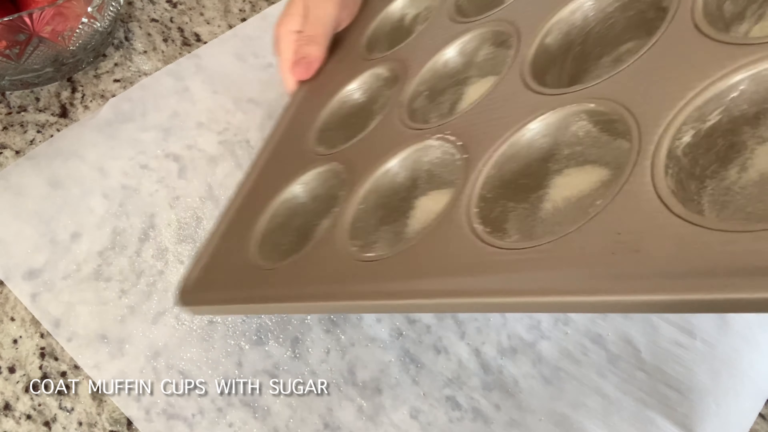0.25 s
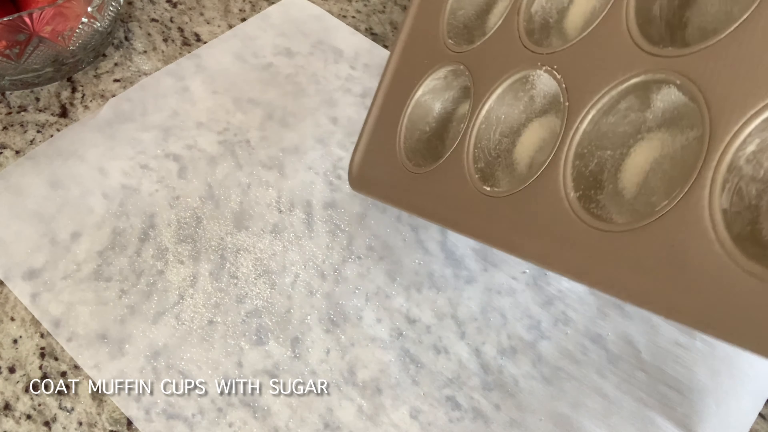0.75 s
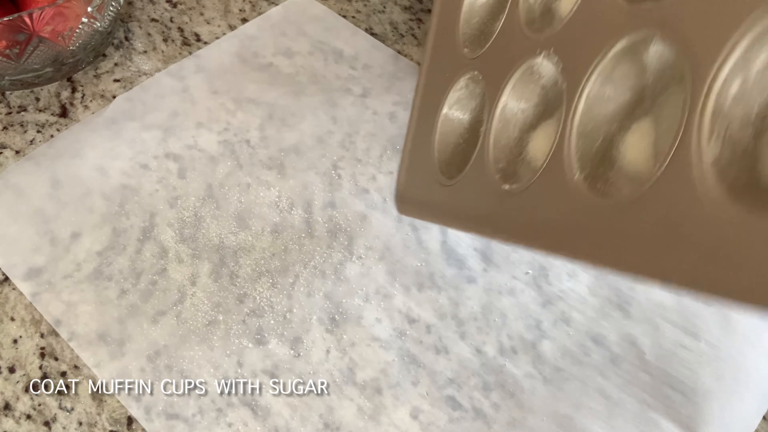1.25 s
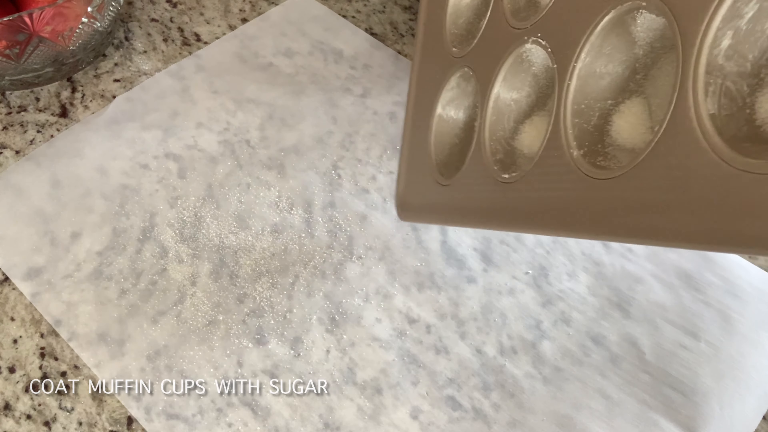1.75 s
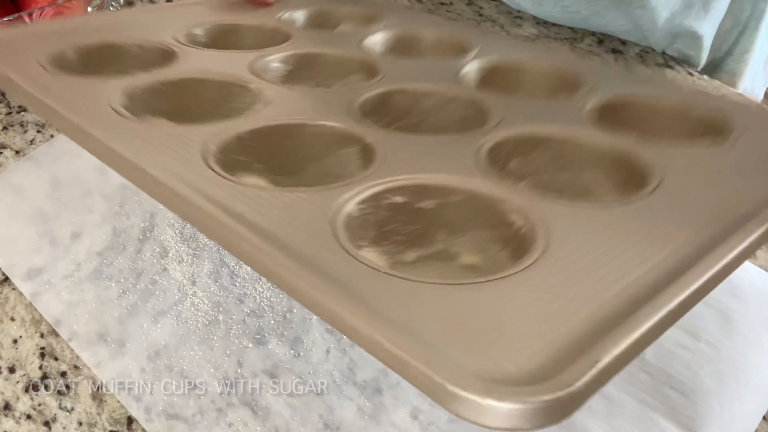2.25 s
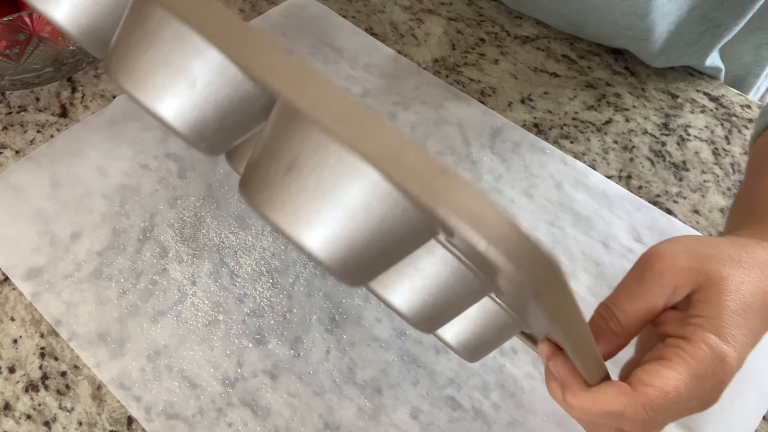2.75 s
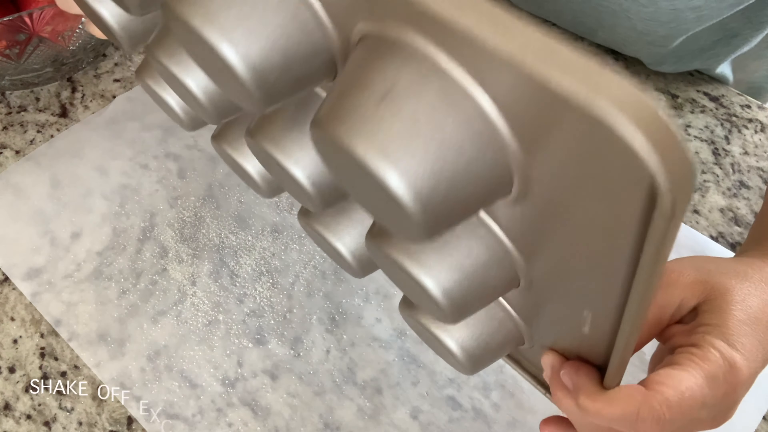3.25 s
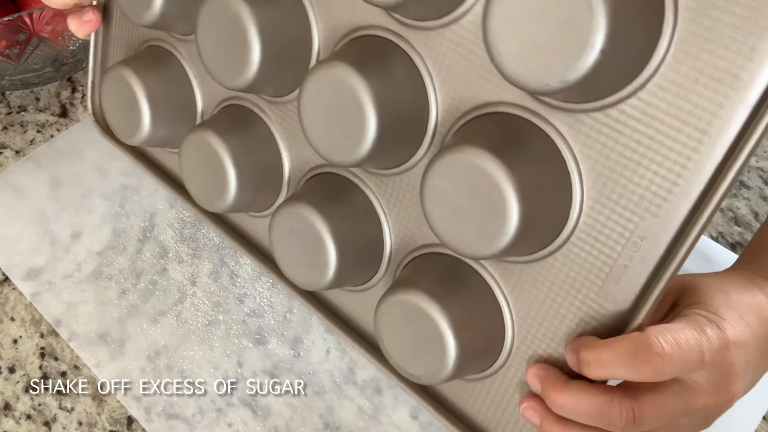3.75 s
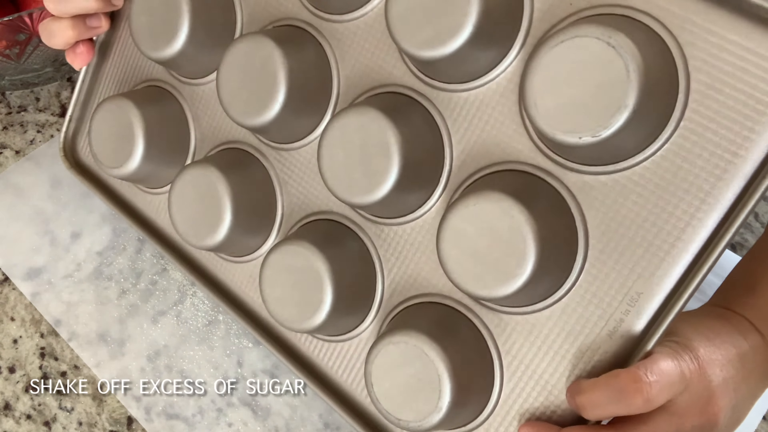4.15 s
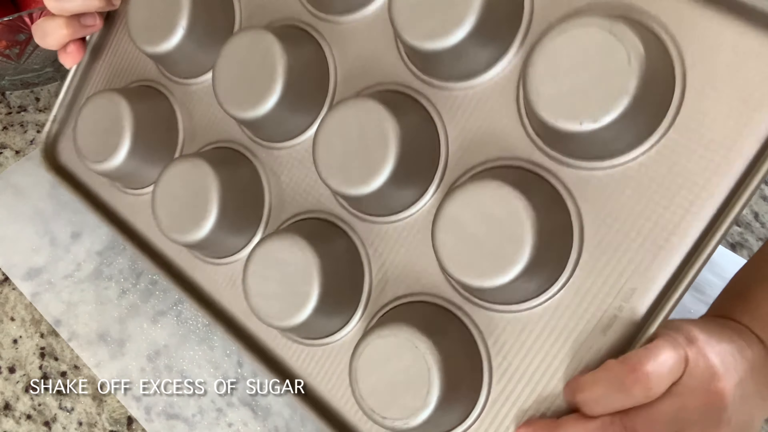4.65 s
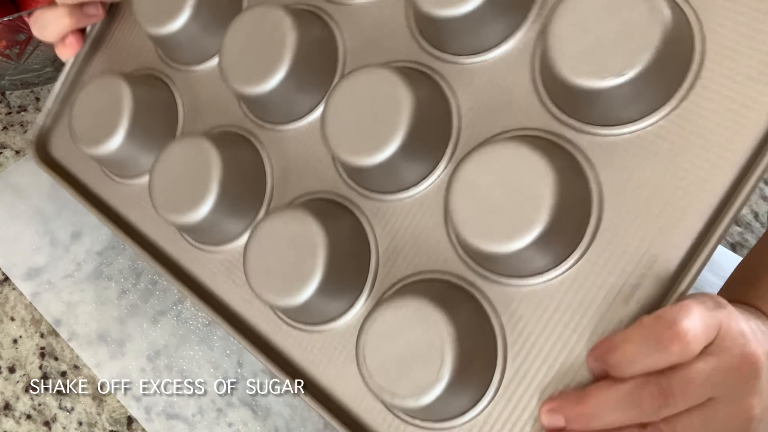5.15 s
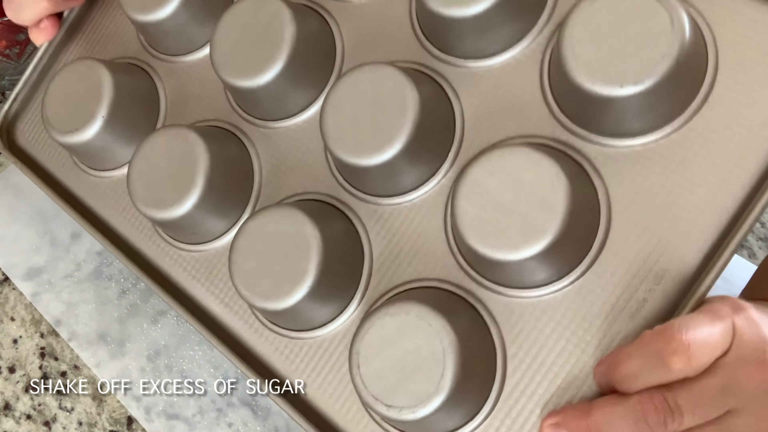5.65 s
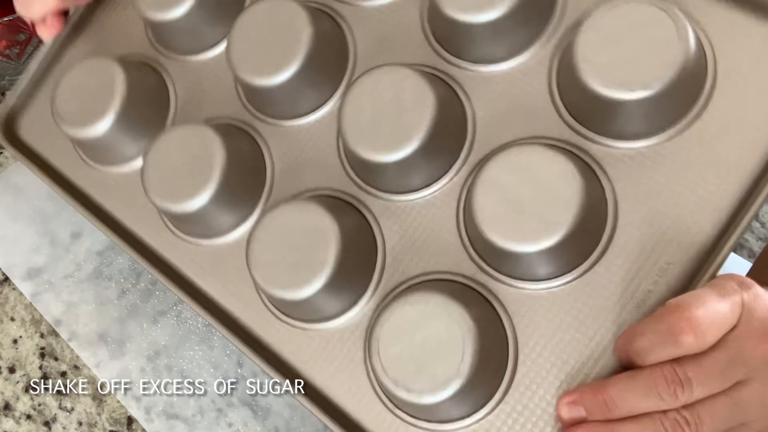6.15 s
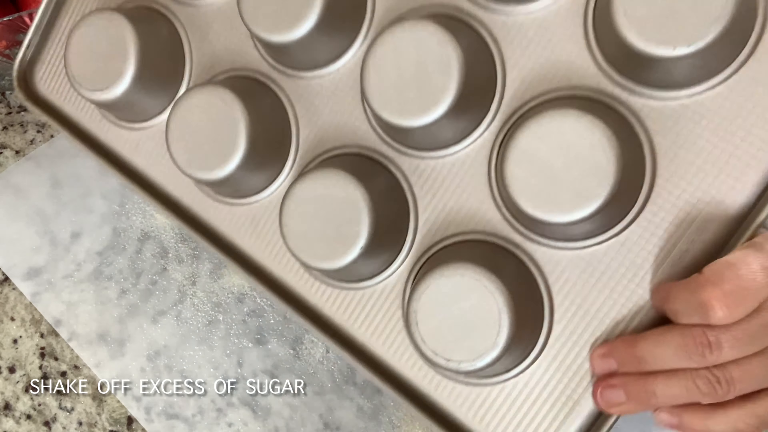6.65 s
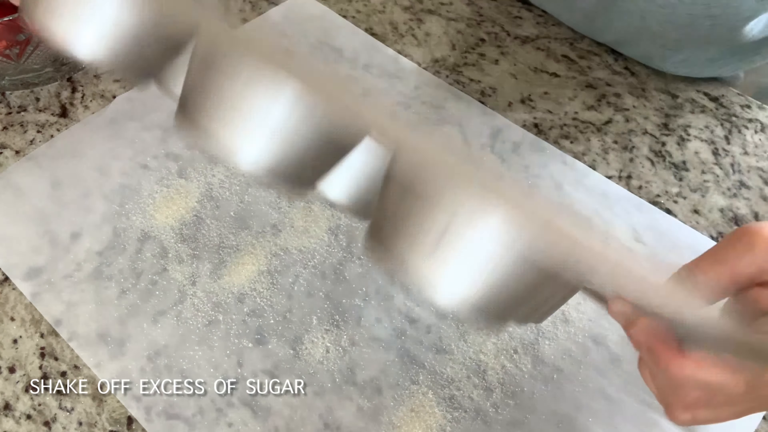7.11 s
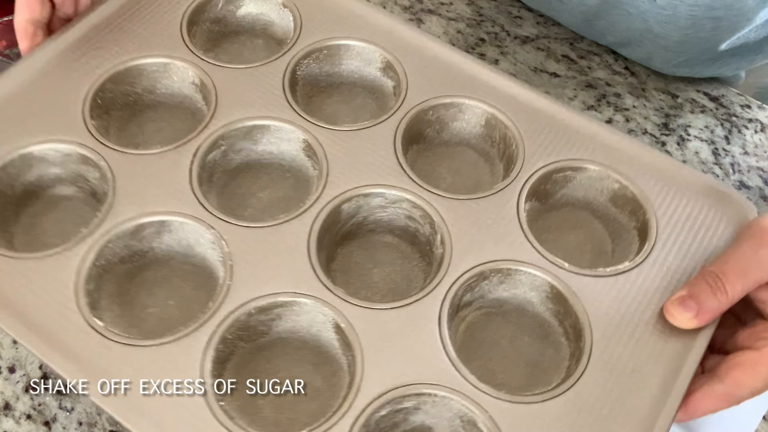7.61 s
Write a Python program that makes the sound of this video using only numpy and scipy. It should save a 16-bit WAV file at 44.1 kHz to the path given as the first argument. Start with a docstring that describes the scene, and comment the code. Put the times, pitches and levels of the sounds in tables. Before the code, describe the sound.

Fine sugar whispers across a steel muffin pan, one sharp clank, then a bright grainy rush onto paper thinning into shaken patter and rustling.

```python
"""Sugar poured from a muffin pan

A steel muffin pan dusted with sugar is tilted over a paper sheet on a kitchen counter. Showers of tiny
random impacts make the sugar hiss over steel and ring the cups. One hard knock rings the pan's modes and
makes the grains jump. Then the pan is turned over: sugar pours and patters onto the paper, with short noise
ticks of crumbs and of the rim, while the rim rubs on it. Echo fills the kitchen; an appliance hums in tones
and narrow resonances, and a soft rush of filtered noise lies behind."""
import sys
import numpy as np
from scipy import signal
from scipy.fft import rfft, irfft, next_fast_len
from scipy.io import wavfile
from scipy.ndimage import uniform_filter1d

SR = 44100
rng = np.random.default_rng(int(sys.argv[2]) if len(sys.argv) > 2 else 0)


def master_out(mix):
    """Clip the mix to full scale and print it as 16-bit PCM to the path in sys.argv[1]."""
    frames = np.transpose(np.atleast_2d(mix))
    ceiling = np.clip(frames, -1, 1)
    pcm = np.round(ceiling * 32767).astype(np.int16)
    wavfile.write(sys.argv[1], SR, pcm)


N = 347448
TIME = np.arange(N) / SR
SIZE = next_fast_len(N, real=True)
FREQ = np.fft.rfftfreq(SIZE, 1 / SR)

# All dB columns are relative levels; the functions that use them set the final balance.
# Heaps of sugar slip as the pan tilts.
# Each row: time of fastest flow in seconds, rise in seconds, fall in seconds, hiss in dB, cup ring in dB.
SLIDES = [(0.166, 0.089, 0.1, -66.5, -59), (.4, 0.078, 0.19, -74.5, -69.5), (.76, 0.1, 0.046, -70, -71),
          (0.898, 0.063, 0.11, -72, -62.5), (1.4, 0.071, 0.16, -83, -76), (1.56, 0.071, 0.1, -79, -76),
          (2.01, 0.045, .1, -71, -70.5), (2.12, 0.088, 0.09, -69, -67.5), (2.36, 0.21, 0.23, -75, -72),
          (2.54, 0.045, 0.082, -73, -69), (3.005, 0.022, 0.043, -75.5, -68.5),
          (3.174, 0.0094, 0.068, -74, -74), (3.275, 0.0775, 0.15, -70.5, -64.5),
          (3.72, 0.25, 0.13, -81.5, -76.5), (4.1, 0.31, .18, -68.5, -65.5), (6.95, 0.22, 0.17, -78.5, -72),
          (7.22, 0.066, 0.13, -76.5, -75), (7.48, 0.073, 0.1, -74.5, -72),
          (7.578, 0.056, 0.072, -79.5, -70.5)]
# Fingers shift their grip and scuff the steel.
# Each row: time of the peak in seconds, rise and fall length in seconds, ring in dB.
SCUFFS = [(0.82, 0.019, -64.5), (0.88, 0.022, -59.5), (1.014, .022, -70), (1.729, 0.03, -72),
          (1.952, 0.038, -75), (3.013, 0.027, -71), (3.22, 0.047, -67), (7.299, .07, -76),
          (7.43, .035, -72), (7.766, 0.076, -79)]
# Hiss of sliding grains on steel. Each row: frequency in Hz, level in dB per Hz.
STEEL_HISS = [(900, -11.5), (2000, -11), (3100, 3), (4800, -0.5), (6500, -0.5), (7300, -15.5), (8100, -1),
              (9500, 1.5), (12000, 0), (14500, -5.5)]
# Resonances that the grains wake in the cups. Each row: frequency in Hz, width in Hz, level in dB.
CUPS = [(1500, 210, -3), (1706, 71, -2), (1838, 100, 1.5), (1952, 27, -7), (2580, 51, -4), (3790, 95.5, -6),
        (4485, 140, -11.5), (4800, 90, -10.5), (5640, 400, -13.5), (6200, 150, -16.5)]
# Thin whistly resonances of the cup walls under a slow trickle.
# Each row: frequency in Hz, width in Hz, level in dB.
WALLS = [(1865, 50, -5), (2635, 37, -6.5), (3796, 77, 5), (6270, 120, 0)]
# The first rush of sugar onto the paper. Each row: time in seconds, hiss in dB.
POUR = [(3.75, -85), (3.79, -58.5), (3.98, -48), (4.12, -45.5), (4.24, -47), (4.38, -54), (4.52, -60.5),
        (4.7, -72)]
# The thin fall that the shaking keeps up. Each row: time in seconds, hiss in dB.
PATTER = [(4.3, -60), (4.52, -62), (4.585, -55), (4.63, -60), (4.665, -48.5), (4.69, -54.5), (4.82, -56),
          (4.92, -60.5), (5.0, -61.5), (5.06, -69), (5.16, -68.5), (5.28, -67.5), (5.37, -71.5),
          (5.43, -60.5), (5.52, -68.5), (5.58, -63.5), (5.64, -70.5), (5.78, -68.5), (5.85, -77),
          (5.94, -73.5), (6.1, -68.5), (6.15, -65), (6.25, -66), (6.32, -67), (6.41, -68), (6.49, -70.5),
          (6.62, -71.5), (6.9, -94)]
# Hiss of grains on paper. Each row: frequency in Hz, level in dB per Hz.
PAPER_HISS = [(500, -53), (1000, -18), (1600, -10), (2300, -11), (3200, -11), (4000, -5.5), (5200, -3.5),
              (7000, -1), (8400, 1), (12000, 0.5), (14000, 1.5), (15500, -11)]
# Ticks of crumbs on the paper, and duller ticks of the rim near 4 kHz.
# Each row: time in seconds, peak in dB, centre frequency in Hz, width in octaves.
TICKS = [(2.9244, -51.5, 11900, 0.37), (3.7863, -58, 11000, 1), (4.5877, -43, 11000, 1.3),
         (4.6617, -43, 10000, 1.1), (5.0007, -41, 8200, 0.69), (5.0714, -55, 10000, 1.1),
         (5.1786, -45, 12500, 0.97), (5.2289, -55, 11600, 1), (5.2594, -59, 10200, 1),
         (5.4292, -34.5, 7900, 1.6), (5.467, -46, 12400, 1.4), (5.6616, -37.5, 10000, 1.2),
         (5.7, -39, 11000, 1.7), (5.7473, -55, 9100, 1.1), (5.8106, -67, 3750, 1.5),
         (5.9533, -64, 3840, 1.8), (6.0227, -45, 12500, 1.1), (6.1339, -53, 10100, 1),
         (6.3579, -55, 12500, 0.87), (6.6164, -55, 11600, 1), (6.6772, -61, 12400, .8),
         (6.931, -47, 12500, 0.9), (7.073, -64, 4400, 1.3)]
# One hard knock, then light taps.
# Each row: start in seconds, force in dB, time from first touch to strongest push in milliseconds.
KNOCKS = [(1.0761, -16, 0.081), (1.521, -65, 0.033), (1.689, -72, 0.016), (2.456, -61.5, 0.074),
          (3.166, -61, 0.042), (5.658, -62.5, 0.096)]
# Modes of the pan, damped by the hands.
# Each row: frequency in Hz, level in dB, time to fall 60 dB in seconds, left minus right in dB.
PAN_MODES = [(137, -15, 0.14, -3), (224.1, -22.5, 0.12, -0.5), (334.5, -10.5, 0.068, -8),
             (386, -17.5, 0.13, -1), (675, -15.5, 0.078, -5), (784, -15.5, 0.12, 3),
             (1134, -19.5, 0.063, -6), (1331, -13.5, 0.069, -0.5), (1476, 2, 0.072, 3.5),
             (1634, -8.5, 0.08, 3), (1740, -8.5, 0.056, 8), (1836, 0, 0.06, 3.5), (1938, -1.5, 0.098, 9.5),
             (2004, -11, 0.086, 14.5), (1950, -15.5, 0.1, 5.5), (2460, -28.5, .08, 13),
             (2474, -8, 0.095, 5), (2622, -6, 0.062, 4.5), (2790, -8, 0.035, -3),
             (3180, -10.5, 0.038, 11.5), (3570, -22, 0.083, 6), (3876, -4, 0.027, 0),
             (4490, 0.5, 0.03, 5.5), (4960, -5.5, .028, 3.5)]
# Crack of a knock, strongest where the modes crowd. Each row: frequency in Hz, level in dB per Hz.
CRACK = [(100, -5.5), (240, -7.5), (340, 0), (550, -7), (790, -5), (880, -15), (1150, -12), (1380, -7),
         (1490, 0.5), (1750, 1), (2050, 2.5), (2250, -4.5), (2500, 1.5), (2830, -3), (3150, 1.5),
         (4450, 3.5), (6000, -6.5), (9000, -11), (15000, -11.5)]
# The rim rubs on the paper at each push and pull of the shaking.
# Each row: time of the peak in seconds, level in dB.
SHAKES = [(4.585, -67), (4.64, -69), (4.755, -72), (4.86, -68.5), (4.985, -70), (5.085, -68), (5.16, -71),
          (5.23, -69), (5.31, -70.5), (5.375, -68), (5.45, -75), (5.525, -73.5), (5.59, -73),
          (5.662, -69.5), (5.74, -78), (5.815, -69), (5.895, -70.5), (5.985, -66.5), (6.055, -66.5),
          (6.152, -67.5), (6.22, -68.5), (6.315, -66), (6.375, -68), (6.445, -69), (6.52, -72), (6.59, -76),
          (6.645, -76)]
# Resonances of the rubbing rim. Each row: frequency in Hz, width in Hz, level in dB.
RIM = [(1358, 53, 6.5), (1700, 430, -4), (2023, 300, -4), (2540, 260, -5.5), (3390, 720, -5.5),
       (4000, 110, -6.5), (4850, 500, -8), (5800, 690, -9)]
# Steady tones of the appliance. Each row: frequency in Hz, level in dB.
HUM = [(108.6, -84), (120, -58), (144.6, -84.5)]
# Resonances that the appliance shakes. Each row: frequency in Hz, width in Hz, level in dB.
DRONES = [(115, 51, -72), (138.2, 23, -69), (174.8, 18, -76), (295.2, 6.9, -80), (382, 12, -85.5),
          (809, 9.8, -76.5), (1011, 15, -79.5), (2590, 137, -88.5)]
# Colour of the soft rush in the room. Each row: frequency in Hz, level in dB per Hz.
ROOM_AIR = [(20, -24), (36, 7.5), (50, 6.5), (90, 3), (150, 5.5), (220, 2.5), (400, 2), (560, 0.5),
            (760, 3.5), (880, -5), (1100, -4), (1600, -15), (2600, -13.5), (4500, -25.5), (8000, -46),
            (15000, -50)]
# Brief dips in level. Each row: centre in seconds, half width in seconds, depth from 0 to 1.
DIPS = [(2.686, 0.022, 0.93), (5.17, 0.034, 0.34)]

SLIDE_EDGE_DB = 10  # how far a swell has dropped after its rise or fall time
# sugar thrown up by the hard knock lands again after a short flight
JUMP_DB, JUMP_FALL_S, FLIGHT_S = -51.5, 0.046, 0.079
LANDING_DB, LANDING_RISE_S, LANDING_FALL_S = -63.5, 0.012, 0.022
# once the pan is turned, the cup walls face away
FACE_UP_UNTIL_S, FACE_DOWN_DB = 2.72, -7
FLICKER_DB = 2.6  # spread of the changes in hiss colour
# the faint ring that outlasts the clang: level against each mode, 60 dB decay up to 1 kHz (then shorter)
LINGER_DB, LINGER_T60_S = -29, 0.8
STROKE_RISE_S, STROKE_FALL_S = 0.044, 0.033
BUMP_S = 0.435  # time of the hand's bump
SUGAR_ECHO_DB, ROOM_BALANCE_DB = -14, -1.8
TOP_HZ = 15150  # the treble is cut above this


def undb(db):
    """Turn decibels into a gain."""
    return np.exp(np.asarray(db) * np.log(10) / 20)


def unit(x):
    """Scale to an rms of 1."""
    return x / np.sqrt(np.mean(x ** 2))


def sides(db):
    """Left and right gains for a level difference, left minus right."""
    return undb(np.array([[db], [-db]]) / 2)


def gain_curve(rows):
    """Gain that follows (seconds, dB) rows, practically silent outside them."""
    rows = np.array(rows)
    return undb(np.interp(TIME, rows[:, 0], rows[:, 1], left=-140, right=-140))


def swell(s, rise_s, fall_s, db):
    """Gain that peaks at s and is SLIDE_EDGE_DB lower rise_s before and fall_s after."""
    away = np.maximum((s - TIME) / rise_s, (TIME - s) / fall_s)
    return undb(db - SLIDE_EDGE_DB * np.minimum(away, 10))


def walk(rate):
    """Smoothly joined random values with an rms of 1; a higher rate changes faster."""
    return unit(np.interp(2 * rate * TIME, np.arange(N // 20), rng.standard_normal(N // 20)))


def filtered(x, gain):
    """Filter by a gain for every frequency."""
    return irfft(rfft(x, SIZE) * gain, SIZE)[..., :N]


def at_pitch(points, hz):
    """Read between (Hz, value) points on a log frequency axis."""
    point_hz, value = np.transpose(points)
    return np.interp(np.log(np.maximum(hz, 1)), np.log(point_hz), value)


def colour(x, points):
    """Filter by a short spectrum of (Hz, dB) points."""
    return filtered(x, undb(at_pitch(points, FREQ)))


def ring(x, response):
    """Pass a sound through a stereo impulse response."""
    return signal.fftconvolve(np.atleast_2d(x), response, axes=1)[:, :N]


def ports(x, lag_ms):
    """A sound from the right reaches the left microphone later."""
    late = filtered(x, np.exp(-2j * np.pi * FREQ * lag_ms / 1000))
    return np.array([late, x])


def resonate(x, modes, wander_db):
    """Ring resonances; neighbours wax and wane apart as the point of contact moves."""
    spectrum = rfft(x, SIZE)
    out = 0
    for group in (modes[::2], modes[1::2]):
        response = 0
        for hz, width, db in group:
            damping = 1j * FREQ * width
            response = response + undb(db) * damping / (hz ** 2 - FREQ ** 2 + damping)
        out = out + undb(wander_db * walk(7)) * irfft(spectrum * response, SIZE)[:, :N]
    return out


def grains(per_s, spread_db):
    """Tiny impacts of uneven size; a thin stream leaves them apart."""
    chance = np.clip(per_s / SR, 1e-4, 1) * np.ones(N)  # of an impact at each sample
    size = undb(spread_db * np.minimum(rng.exponential(size=N), 5))
    hits = rng.random(N) < chance
    return unit(hits * size * rng.choice([-1, 1], N) / np.sqrt(chance))


def shower(per_s, spread_db, lag_ms, apart):
    """Grains heard by both microphones, plus scattered ones that reach only one."""
    shared = ports(grains(per_s, spread_db), lag_ms)
    scattered = np.array([grains(per_s, spread_db) for _ in range(2)])
    return shared + apart * scattered


def heaps():
    """How much sugar slides and how hard it stirs the steel; overlapping heaps add in power."""
    flow_power, stir_power = 0, 0
    for s, rise_s, fall_s, hiss_db, ring_db in SLIDES:
        shape = swell(s, rise_s, fall_s, 0)
        flow_power = flow_power + (shape * undb(hiss_db)) ** 2
        stir_power = stir_power + (shape * undb(ring_db)) ** 2
    return np.sqrt(flow_power), np.sqrt(stir_power)


def scuffing():
    """How hard the shifting fingers stir the steel."""
    return np.sqrt(sum(swell(s, length_s, length_s, db) ** 2 for s, length_s, db in SCUFFS))


def sliding(flow, stir, hiss_db=3, ring_db=2, flutter_db=0.36):
    """Grains skitter over the steel: a bright hiss, and the cups ring faintly under them."""
    rate = 9000 * np.sqrt(flow / undb(-73.0))  # more flow, more impacts per second
    hiss = unit(colour(shower(rate, 1.2, 0.018, 1.0), STEEL_HISS)) * flow * sides(-1.176)
    metal = unit(resonate(shower(5000, 3.3, 0.092, 0.95), CUPS, wander_db=4.5)) * stir
    return (undb(hiss_db) * hiss + undb(ring_db) * metal) * undb(flutter_db * walk(25))


def trickling(flow, grain_db=2, level_db=-8.5, follow=0.705, full_db=-66):
    """A thin film of grains creeps down the cup walls behind each heap."""
    facing = undb(FACE_DOWN_DB * (TIME > FACE_UP_UNTIL_S))
    # a power below 1 makes the film vary less than the heaps
    film = undb(full_db + level_db) * (flow / undb(full_db)) ** follow
    whistle = unit(resonate(shower(6000, grain_db, 0.028, 0.65), WALLS, wander_db=1.5))
    return whistle * film * facing


def jump(rise_s=0.0027):
    """The hard knock throws the sugar up; it patters down again."""
    s = KNOCKS[0][0]
    thrown = swell(s, rise_s, JUMP_FALL_S, JUMP_DB)
    return thrown + swell(s + FLIGHT_S, LANDING_RISE_S, LANDING_FALL_S, LANDING_DB)


def pouring(hiss_db=2, clump_db=-0.25, flutter_db=0.9, lag_ms=0.081):
    """The knock spills a short spray and the turned pan a dense stream; both land in small clumps."""
    stream = shower(7000, 2.8, lag_ms, 0.85)
    hiss = unit(colour(stream, PAPER_HISS)) * (gain_curve(POUR) + jump()) * sides(-0.4)
    return hiss * undb(hiss_db + flutter_db * walk(22) + clump_db * walk(300))


def pattering(hiss_db=2.0, clump_db=1.6, flutter_db=1.0):
    """Shaken loose, the last sugar thins out to a patter of separate grains."""
    flow = gain_curve(PATTER)
    rate = 8000 * (flow / undb(-62)) ** 0.4
    stream = shower(rate, 2.8, 0.08, 0.65)
    hiss = unit(colour(stream, PAPER_HISS)) * flow * sides(-0.3)
    return hiss * undb(hiss_db + flutter_db * walk(30) + clump_db * walk(250))


def flicker(x, size=384):
    """Random gains make the colour of the hiss flicker from instant to instant."""
    spectra = signal.stft(x, nperseg=size)[2]
    chance = rng.standard_normal(spectra.shape[1:])
    chance = unit(uniform_filter1d(chance, size=2, axis=0))  # neighbouring frequencies change alike
    return signal.istft(spectra * unit(undb(FLICKER_DB * chance)), nperseg=size)[1][:, :N]


def ticks(level_db=1, snap_s=0.0006, scatter_db=-18, scatter_s=0.008):
    """Crumbs tick on the paper and the rim ticks duller: a short noise snap with a weaker tail."""
    out = np.zeros(N)
    t = TIME[:SR // 20]
    fade = np.exp(-t / snap_s) + undb(scatter_db) * np.exp(-t / scatter_s)
    for s, db, hz, octaves in TICKS:
        burst = rng.standard_normal(len(t)) * fade
        edges = hz * 2 ** (np.array([-octaves, octaves]) / 2)
        edges = np.minimum(edges, SR / 2 - 2000)
        tick = signal.sosfilt(signal.butter(2, edges, "band", fs=SR, output="sos"), burst)
        start = int(s * SR)
        out[start:start + len(t)] += undb(db + level_db) * tick / np.abs(tick).max()
    return ports(out, 0.048) * sides(-0.51)


def pan_response(lag_cycles=0.74, rise_ms=1.0, split=0.006, twin_db=-4):
    """Modes start together, low ones a little late; a faint ring beats between near-alike cups."""
    out = 0
    for hz, db, t60, balance_db in PAN_MODES:
        t = np.maximum(TIME[:SR // 2] - lag_cycles / hz, 0)
        phase = 0.55 * rng.standard_normal((2, 1))
        twin_hz = hz * (1 + split * rng.uniform(0.5, 2) * rng.choice([-1, 1]))
        onset = 1 - np.exp(-t * 1000 / rise_ms)
        tone = np.sin(2 * np.pi * hz * t + phase)
        twin = undb(twin_db) * np.sin(2 * np.pi * (twin_hz * t + rng.random((2, 1))))
        # above 1 kHz, higher modes die sooner
        linger = undb(LINGER_DB - 60 * t / LINGER_T60_S * np.sqrt(max(hz / 1000, 1)))
        mode = undb(-60 * t / t60) * tone + linger * (tone + twin)
        out = out + undb(db) * onset * mode * sides(balance_db)
    return out


def knocks(crack_db=-5.5, crack_t60=0.1):
    """Each contact pushes the pan briefly: main modes clang, and its crowded other modes crack."""
    force = np.zeros(N)
    for s, db, ms in KNOCKS:
        age = np.clip((TIME - s) * 1000 / ms, 0, 50)
        push = age * np.exp(-age)
        force += undb(db) * push / push.sum()
    # a thin sheet radiates no deep bass
    force = signal.sosfilt(signal.butter(2, 80, "high", fs=SR, output="sos"), force)
    t = TIME[:SR // 3]
    crack = unit(colour(rng.standard_normal((2, N)), CRACK))[:, :len(t)]
    crack = crack * undb(crack_db - 60 * t / crack_t60)
    return ring(force, pan_response()), ring(force, crack)


def shaking():
    """Pressure of the rim on the paper: it swells with every stroke."""
    return np.sqrt(sum(swell(s, STROKE_RISE_S, STROKE_FALL_S, db) ** 2 for s, db in SHAKES))


def rubbing(level_db=1.0, catch_db=1.0):
    """The rim grinds over spilt grains; a fast random flutter stands for catching and slipping."""
    grind = unit(resonate(shower(2800, 1.7, 0.018, 0.93), RIM, wander_db=1.0))
    return grind * shaking() * undb(level_db + catch_db * walk(90))


def hand_thump(hz=185, db=-48.5, t60=0.15):
    """A soft bump of the hand flexes the pan: a low tone that dies away."""
    t = np.maximum(TIME - BUMP_S, 0)
    fade = undb(db - 60 * t / t60) * (1 - np.exp(-t / 0.0034))
    return fade * np.sin(2 * np.pi * hz * t) * sides(-2)


def kitchen(x, t60_low, t60_high):
    """Diffuse echo of cupboards and tiles, made from fading noise; the treble dies first."""
    t = TIME[:SR]
    noise = rng.standard_normal((2, SR))
    low = signal.sosfilt(signal.butter(2, 3500, fs=SR, output="sos"), noise)
    high = signal.sosfilt(signal.butter(2, 4500, "high", fs=SR, output="sos"), noise)
    tail = low * undb(-60 * t / t60_low) + high * undb(-60 * t / t60_high)
    tail = tail * (1 - np.exp(-t / 0.0036))  # the echo builds up softly
    return ring(x, tail / np.sqrt(np.sum(tail ** 2) / 2))


def appliance(lag_ms=0.48):
    """Steady mains and motor tones over the narrow resonances they shake."""
    hum = sum(np.sqrt(2) * undb(db) * np.sin(2 * np.pi * hz * TIME) for hz, db in HUM)
    power = 0
    for hz, width, db in DRONES:
        peak = unit(1 / (1 + (2 * (FREQ - hz) / width) ** 2))
        power = power + (undb(db) * peak) ** 2
    drone = filtered(rng.standard_normal(N), np.sqrt(power))
    return (hum + ports(drone, lag_ms)) * sides(-4.0)


def air(level_db=-66, apart_hz=450, lag_ms=0.43):
    """Soft fan-like rush from the right, more diffuse towards the treble."""
    scattered = filtered(rng.standard_normal((2, N)), 1.3 * FREQ / (FREQ + apart_hz))
    rush = ports(rng.standard_normal(N), lag_ms) + scattered
    return undb(level_db) * unit(colour(rush, ROOM_AIR)) * sides(ROOM_BALANCE_DB)


def scene():
    """Pan, sugar and hum in a small kitchen."""
    clang, crack = knocks()
    flow, stir = heaps()
    on_steel = sliding(flow, np.hypot(stir, scuffing())) + trickling(flow)
    sugar = flicker(on_steel + pouring() + pattering()) + rubbing()
    # the clang beams at the microphone; the crack spreads all round the room
    to_room = undb(-25.5) * clang + undb(1.0) * crack + undb(SUGAR_ECHO_DB) * sugar
    echo = kitchen(to_room, t60_low=0.64, t60_high=0.5)
    return clang + crack + hand_thump() + sugar + ticks() + echo + appliance() + air()


def record(dry):
    """The level dips briefly twice; the top is cut."""
    for s, width, depth in DIPS:
        dry = dry * (1 - min(depth, 1) * np.exp(-((TIME - s) / width) ** 2))
    return signal.sosfilt(signal.ellip(10, 0.2, 70, TOP_HZ, fs=SR, output="sos"), dry)


dry = scene()
out = record(dry)
master_out(out)
```